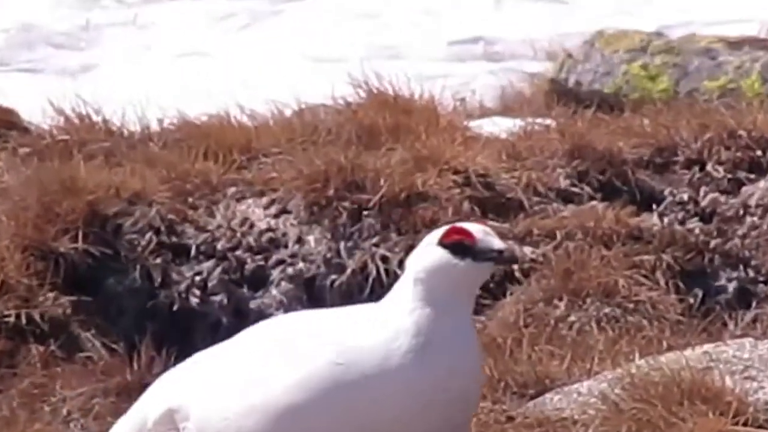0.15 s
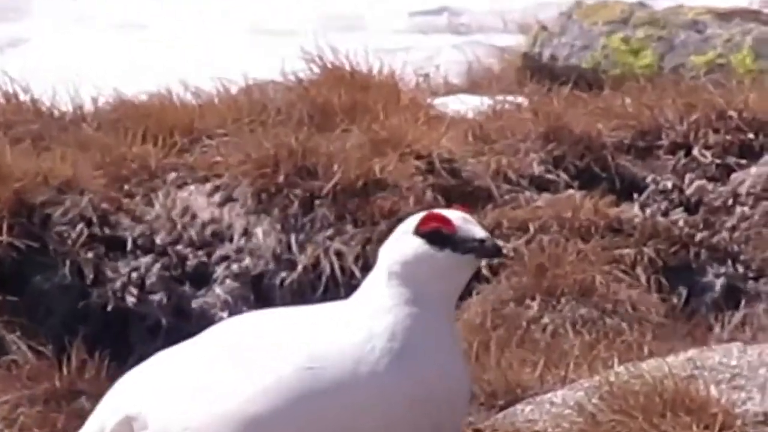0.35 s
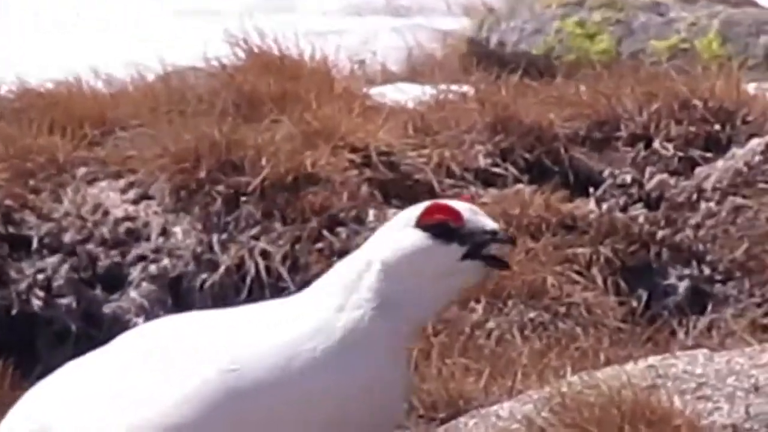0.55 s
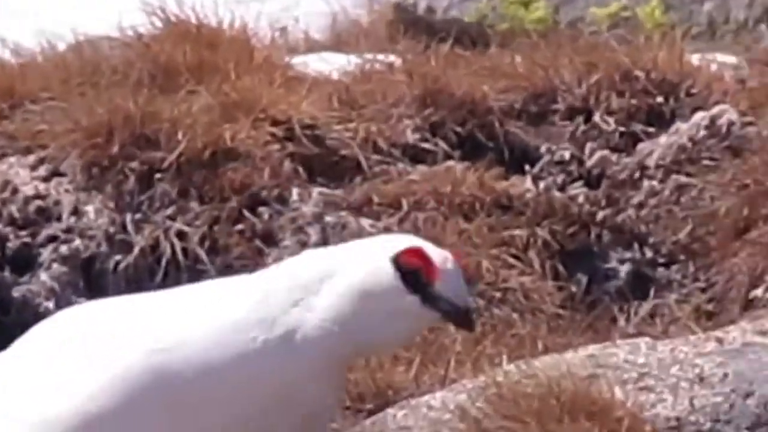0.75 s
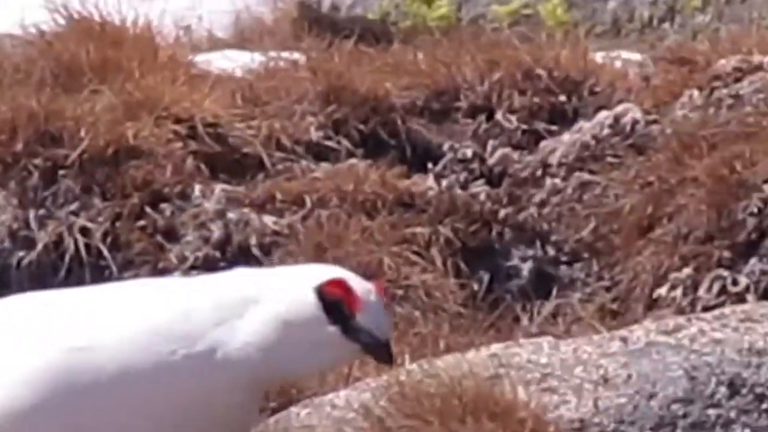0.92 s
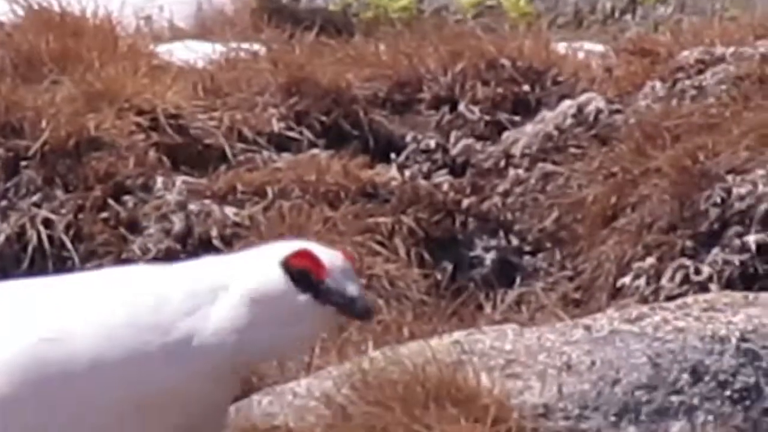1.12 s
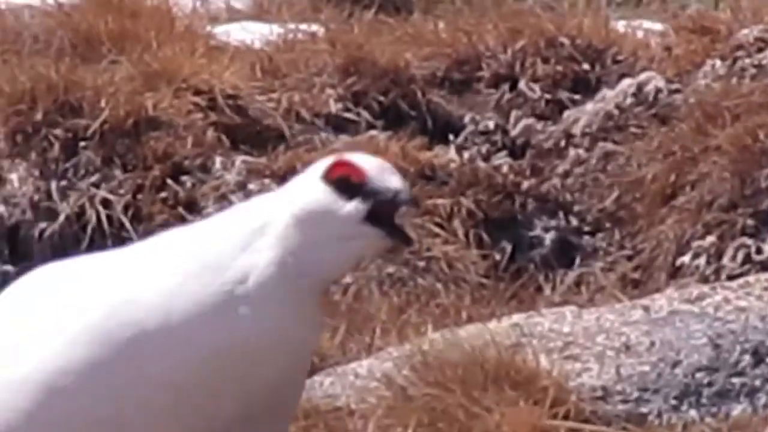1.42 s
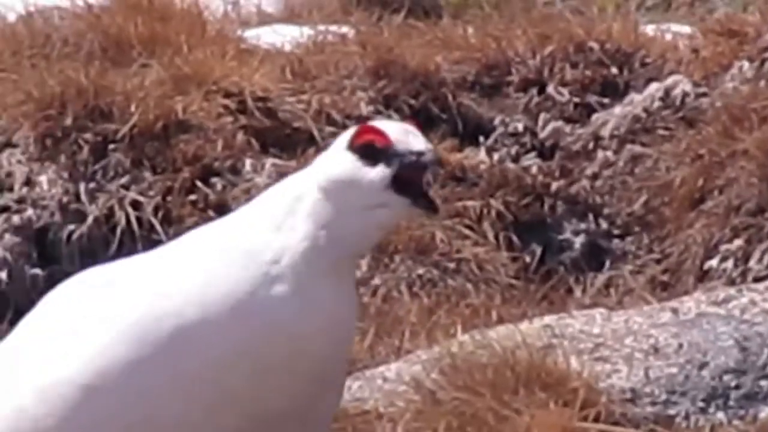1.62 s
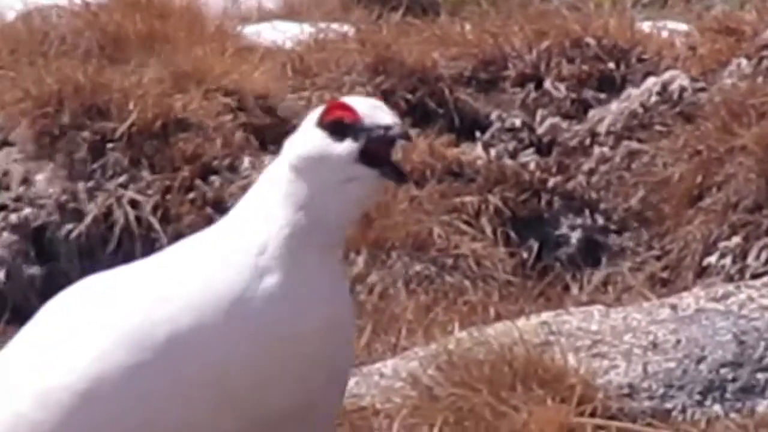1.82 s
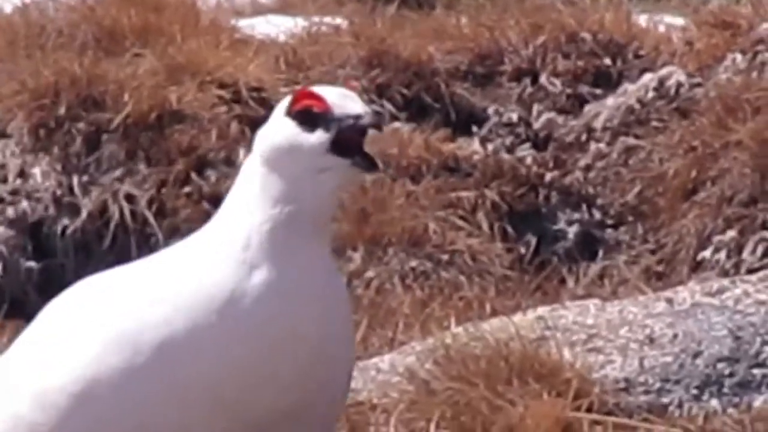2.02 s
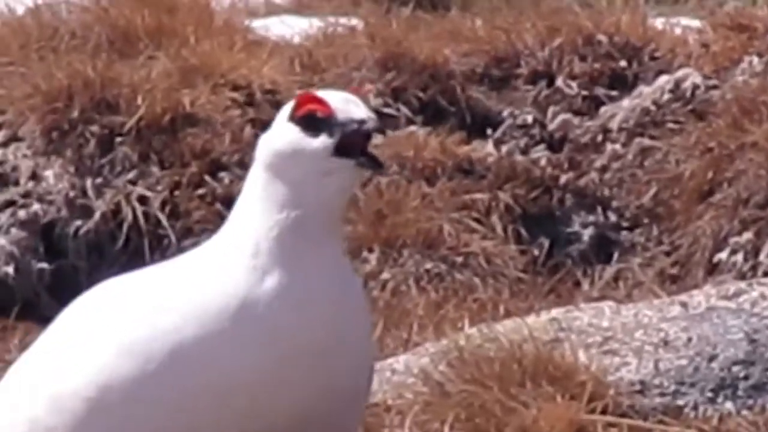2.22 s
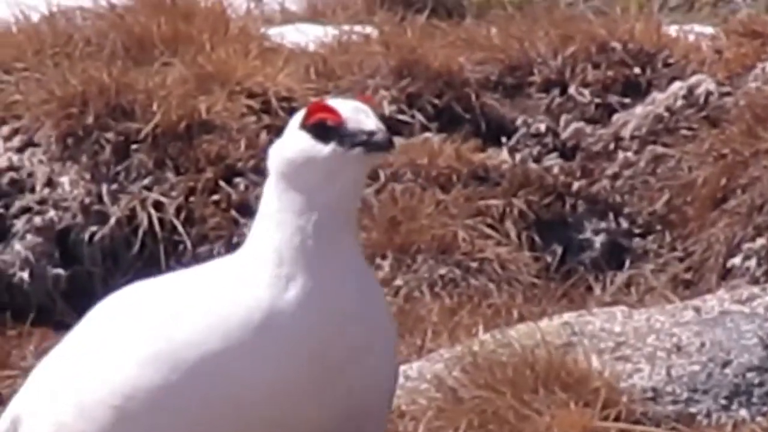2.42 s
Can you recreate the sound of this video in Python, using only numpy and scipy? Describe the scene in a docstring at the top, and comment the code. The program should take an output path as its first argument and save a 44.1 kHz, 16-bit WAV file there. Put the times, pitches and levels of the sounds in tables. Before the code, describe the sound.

A ptarmigan's dry ticks and long rattling croak in light wind, after one hard microphone knock

```python
"""A ptarmigan on a windy mountainside gives a few dry ticks, a short run and then a long rattling croak.
Each tick is one pulse ringing four throat resonances, which shift as the beak opens.
Wind is shaped noise, with low swings puffing on the microphone ports; dry grass rustles as spiky noise.
Sparse noise grains and a few clicks, one of them hard, ring the modes of the camera housing.
Gain control ducks the whole mix after the knock, then lets it creep back."""
import sys
import numpy as np
from scipy import signal
from scipy.fft import rfft, irfft
from scipy.io import wavfile
from scipy.ndimage import uniform_filter1d

SR = 44100
rng = np.random.default_rng(int(sys.argv[2]) if len(sys.argv) > 2 else 0)


def transcribe(u):
    """Save the signal u as a 16-bit wav file named by the first command-line argument.

    u: samples, shape (n,) or (channels, n), limited to [-1, 1]; the rate is SR.
    q: integer samples, one column per channel.
    """
    v = np.clip(np.atleast_2d(u).T, -1, 1)
    q = np.round(v * 32767).astype(np.int16)
    wavfile.write(sys.argv[1], SR, q)


N = 112454  # length in samples

# Wind and hiss colour, relative: hz, density_db (per Hz)
WIND_COLOUR = [(20, -3), (45, 2.5), (110, -7), (200, -8), (400, -11), (800, -16.5), (1500, -22),
               (3000, -26.5), (6000, -32), (10000, -37.5), (13000, -42.5), (15500, -50.5)]
# Strength of the wind over time: time_s, strength_db
WIND_STRENGTH = [(0, -1), (.15, -2), (.3, 2.5), (.5, -3.5), (.8, -2), (1.1, -2.5), (1.35, -2.5),
                 (1.6, -1.5), (1.75, 0), (1.95, -1.5), (2.25, -0.5), (2.55, -3)]
# How far each band follows the wind: hz, share
WIND_FOLLOW = [(60, 1.35), (500, 0.51), (2000, .8), (6000, 0.342), (15000, .2)]
AIR_DB = -44  # overall wind level, rms
GUST_DB, PATCH_DB = 1.27, 1.63  # rms wander of all bands together, and of patches, before the share

# Clicks of the camera housing: start_s, level_db (before panning)
HOUSING_CLICKS = [(0.079, -41), (.229, -34.5), (0.255, -37.5), (0.2931, -31.5), (.339, -43), (0.3936, -22),
                  (0.4051, 4.5), (0.4126, -17), (.643, -37), (0.868, -43.5), (0.89, -55), (1.0207, -38.5)]
# Modes of the housing: pitch_hz, level_db (relative), ring_t60_s
HOUSING_MODES = [(635, -16.5, 0.028), (689, -13, .035), (889, -16, .028), (1010, -47, .22),
                 (1432, -0.5, 0.011), (1665, -6, 0.0082), (1740, -45, .15), (2097, -9.5, 0.0087),
                 (2374, -10.5, 0.017), (3380, -13, 0.0088), (4120, -21, 0.021), (4900, -14.5, .012),
                 (5420, -31, 0.0096), (6670, -27, 0.012), (10040, -25.5, 0.0081), (11440, -23, 0.0047)]
# Colour of the crack that starts each click, relative: hz, density_db (per Hz)
CRACK_COLOUR = [(100, -31.5), (400, -19.5), (700, -5), (1500, 2), (2500, -6), (2900, -16), (4700, -4),
                (5600, -25), (11500, -11), (15000, -37)]
# Colour of the faint diffuse ring that follows, relative: hz, density_db (per Hz)
AFTER_RING_COLOUR = [(200, -23), (600, -12), (1000, -6), (1200, -17.5), (1700, 0.5), (2100, -10.5),
                     (3000, -25.5), (8000, -50.5)]
# Level of the grainy noise before the hard knock, a faint scrape, then a steep swell:
# time_s, level_db (before softening and panning)
GRAIN_LEVEL = [(.18, -60.5), (.23, -54.5), (.31, -46.5), (.325, -54.5), (.35, -44.5), (.39, -41),
               (.404, -6.5), (.41, -75)]
GRAINS_PER_S, GRAIN_TOP_HZ = 230, 3200  # mean rate on each side; the grains are duller above this
PORT_LAG_S = 0.00006  # clicks reach the left port this much later
CRACK_DB, CRACK_S = -13.5, 0.0026  # level, decay time constant
AFTER_DB, AFTER_T60 = -42.5, 0.38  # level, ring time in seconds
HOUSING_LOW_HZ, HOUSING_PAN_DB = 480, 3.5  # low cut; left over right

# Puffs of wind on the ports: start_s, level_db (before the split), pitch_hz, rise_s, right_share (0-1)
WIND_PUFFS = [(.19, -23, 50.4, 0.022, .98), (0.223, -12, 121, 0.0036, 1), (0.235, -17, 58.6, 0.0039, 0.9),
              (0.25, -23, 96, 0.0092, .98), (0.284, -19.5, 74.6, 0.0051, 0.8), (.335, -29, 145, .004, 0.14),
              (0.82, -28, 71, 0.0022, 0.2), (0.887, -25.5, 179, 0.0017, 0.05),
              (.983, -26.5, 109, 0.0049, 0.2), (1.322, -35.5, 98, 0.0047, 0.5),
              (1.752, -29.5, 103, 0.0076, 0.64)]

# Pulses of the voice: start_s, low_db, main_db, third_db, top_db (relative resonance levels)
VOICE_PULSES = [(0.7776, -56.5, -53.0, -65, -80), (0.813, -47.5, -39, -46.5, -65),
                (0.85, -69, -54, -50, -71.0), (0.8914, -52, -83, -63.0, -72), (0.9367, -57, -65, -77, -74),
                (1.3621, -59, -63.0, -78, -73.0), (1.4013, -58.5, -57, -65.0, -76.0),
                (1.4374, -49.5, -58, -57, -64), (1.4716, -46.5, -57, -51.5, -57),
                (1.5055, -44.5, -47, -49.5, -54), (1.539, -50, -49.5, -60, -57),
                (1.6791, -47, -44.5, -70, -64), (1.7048, -43.5, -42.0, -67, -61),
                (1.7352, -46.5, -46.0, -73, -59), (1.7651, -47.0, -53.5, -60, -67.0),
                (1.796, -45.5, -54, -57, -65), (1.8259, -44.5, -53, -50.5, -68),
                (1.8553, -44, -56, -52.5, -69.0), (1.8823, -44.5, -46, -49, -71),
                (1.9109, -41.5, -48.5, -49.5, -76), (1.9391, -42.5, -45, -58, -70),
                (1.9662, -42.5, -39.5, -65, -60), (1.9933, -45, -36.5, -64, -57),
                (2.02, -43.0, -35.0, -59, -73), (2.0472, -41.5, -33.5, -53.5, -74),
                (2.0732, -43.5, -33.5, -53, -66.0), (2.1009, -41.5, -33.0, -58, -57),
                (2.1278, -41.5, -33.5, -53, -53), (2.1544, -42, -34.0, -53.5, -63.0),
                (2.18, -41.5, -36.0, -55, -64.0), (2.2077, -38.5, -36.5, -58, -70),
                (2.2353, -41, -38, -49.0, -52), (2.2632, -39.5, -38.0, -51.5, -53),
                (2.2921, -42.5, -40.5, -51, -65.0), (2.321, -42, -35.0, -50, -56),
                (2.3492, -40, -35.5, -54, -59), (2.3802, -44.5, -37, -57, -55.5)]
# Throat as the beak opens: time_s, low_hz, main_hz, third_hz, top_hz, ring_t60_s
THROAT_SHAPE = [(.81, 1130, 2345, 3100, 5170, 0.022), (.9, 930, 2130, 2630, 5100, 0.0039),
                (1.4, 980, 2160, 2700, 5200, .007), (1.5, 1253, 2380, 3240, 5570, 0.026),
                (1.7, 1177, 2390, 3700, 5030, 0.024), (1.85, 1200, 2280, 3260, 5000, 0.016),
                (1.96, 1245, 2493, 3360, 5160, 0.026), (2.07, 1310, 2480, 4100, 5400, 0.021),
                (2.21, 1385, 2380, 3780, 5640, 0.022), (2.38, 1295, 2380, 3700, 6100, 0.024)]
# The four resonances: ring_share (of the throat's), starting_flatness (share of pitch), trim_db
THROAT_RESONANCES = [(1.1, 0.11, -2.5), (0.83, 0.16, 0), (0.62, 0.17, -1.5), (0.47, 0.098, -5)]
# Colour of the noisy snap that starts each pulse, relative: hz, density_db (per Hz)
SNAP_COLOUR = [(100, -20), (400, 7), (900, -6), (1750, -2), (2700, 1), (4000, -16), (4600, -17),
               (6500, -20), (10000, -27.5), (15000, -34)]
SETTLE_S, PULSE_RISE_S = 0.0014, 0.00036  # time constants of the slide up to pitch and of the rise
SNAP_DB, SNAP_S = -4, 0.0023  # level over the low resonance, decay time constant
PUSH_DB, PUSH_S = 9.5, 0.00026  # push of air: peak over the low resonance level, time to peak
PITCH_JITTER, RING_JITTER = 0.016, 0.08  # pulse-to-pulse spread, as shares
BIRD_PAN_DB = 1.6  # left over right
GROUND_DB, GROUND_T60 = -9.5, 0.05  # scatter level, decay in seconds

# Rustles in dry grass: start_s, length_s, level_db (before the swell), pitch_factor
GRASS_RUSTLES = [(.866, 0.029, -44.5, .29), (1.152, 0.039, -48.5, 1), (1.278, 0.028, -48, 0.99)]
# Resonances of the stems, before the pitch factor: pitch_hz, width_hz, level_db (relative)
GRASS_STEMS = [(2230, 1000, 0.5), (3560, 240, 6), (4360, 360, -4)]

# Stereo widening in the recorder: hz, side_gain_db
SIDE_GAIN = [(50, 8), (150, 8.5), (400, 4.5), (800, 5.5), (1400, 4.5), (2600, 3), (15000, -2)]
LIMIT_DB, DUCK_SHARE = -10, 1  # threshold, share of the excess taken off
RECOVER_DB_PER_S, DUCK_HOLD_S, DUCK_ATTACK_S = 16, 0.069, 0.0023
EDGE_HZ = 15800  # upper band limit


def amp(db):
    """Turns decibels into gain."""
    return 10 ** (np.asarray(db) / 20)


def evened(x):
    """Scales to rms 1."""
    return x / np.sqrt(np.mean(x ** 2) + 1e-20)


def read(points, hz):
    """Reads a spectrum on a log-frequency axis."""
    f, value = np.transpose(points)
    return np.interp(np.log(hz + 1), np.log(f + 1), value)


def along(table, t):
    """Reads every column of a curve at time t."""
    s, *columns = np.transpose(table)
    return [np.interp(t, s, c) for c in columns]


def add(mix, s, sound):
    """Mixes a sound in at time s."""
    part = mix[..., max(round(s * SR), 0):][..., :sound.shape[-1]]
    part += sound[..., :part.shape[-1]]


def seconds(size):
    """Gives a time axis of so many samples."""
    return np.arange(size) / SR


def ring_down(t, t60):
    """Exponential decay that falls 60 dB in t60 seconds."""
    return np.exp(-np.log(1000) * t / t60)


def hiss(spectrum, size):
    """Two unrelated noises of one colour, rms 1."""
    gain = amp(read(spectrum, np.fft.rfftfreq(size, 1 / SR)))
    white = rng.standard_normal((2, size))
    return evened(irfft(rfft(white) * gain, size))


def air():
    """Wind noise, unrelated at the two ports, each band following the gusts by its own share."""
    hop = 256
    frames, hz = N // hop + 5, np.fft.rfftfreq(1024, 1 / SR)
    real, imag, patches = rng.standard_normal((3, 2, len(hz), frames))
    # Patches drift over both pitch and time; gusts move every band at once
    patches = uniform_filter1d(patches, size=12, axis=1)
    patches = evened(uniform_filter1d(patches, size=6, axis=2))
    gusts = evened(uniform_filter1d(rng.standard_normal((2, 1, frames)), size=6, axis=2))
    strength = along(WIND_STRENGTH, seconds(frames) * hop)[0]
    movement_db = strength + GUST_DB * gusts + PATCH_DB * patches
    field_db = read(WIND_COLOUR, hz)[:, None] + read(WIND_FOLLOW, hz)[:, None] * movement_db
    noise = signal.istft((real + 1j * imag) * amp(field_db), nperseg=1024, noverlap=768)[1]
    return amp(AIR_DB) * evened(noise[:, :N])


def housing_ring():
    """One blow to the camera body: ringing modes, a noisy crack and a faint diffuse after-ring."""
    t = seconds(size=10000)
    ring = np.zeros((2, len(t)))
    for k, (hz, db, t60) in enumerate(HOUSING_MODES):
        sign = (-1) ** k  # neighbouring modes start in opposite directions
        ring += sign * amp(db) * ring_down(t, t60) * np.sin(2 * np.pi * hz * t)
    ring += amp(CRACK_DB) * hiss(CRACK_COLOUR, size=len(t)) * np.exp(-t / CRACK_S)
    ring += amp(AFTER_DB) * hiss(AFTER_RING_COLOUR, size=len(t)) * ring_down(t, AFTER_T60)
    low_cut = signal.butter(4, HOUSING_LOW_HZ, "high", fs=SR, output="sos")
    return signal.sosfilt(low_cut, ring)


def housing():
    """Sparse random grains and a few clicks, one of them hard, set the camera body ringing."""
    ring = housing_ring()
    grains = rng.standard_normal((2, N)) * (rng.random((2, N)) < GRAINS_PER_S / SR)
    grains = signal.lfilter(*signal.butter(1, GRAIN_TOP_HZ, fs=SR), evened(grains))
    grains *= amp(along(GRAIN_LEVEL, seconds(N))[0]) / np.linalg.norm(ring[0])
    out = signal.fftconvolve(grains, ring, axes=1)[:, :N]
    for start, db in HOUSING_CLICKS:
        add(out[0], start + PORT_LAG_S, amp(db) * ring[0])
        add(out[1], start, amp(db) * ring[1])
    return out * amp([[HOUSING_PAN_DB / 2], [-HOUSING_PAN_DB / 2]])


def puffs():
    """Eddies push on the ports: low swings that swell and die."""
    out, t = np.zeros((2, N)), seconds(size=7000)
    for start, db, hz, rise, right in WIND_PUFFS:
        swell = t / rise * np.exp(1 - t / rise)
        swing = amp(db) * swell * np.sin(2 * np.pi * hz * t)
        add(out, start, np.outer([1 - right, right], swing))
    return out


def pulse(start, *levels_db):
    """A push of air and a noisy snap, with four throat resonances that slide up to pitch and ring out."""
    t = seconds(size=1764)
    low_db = levels_db[0]
    *pitches, ring = along(THROAT_SHAPE, start)
    chance = rng.standard_normal(5)
    pitches = pitches * (1 + PITCH_JITTER * chance[1:])
    ring = ring * np.exp(RING_JITTER * chance[0])
    rise = 1 - np.exp(-t / PULSE_RISE_S)
    snap = evened(hiss(SNAP_COLOUR, size=len(t))[0] * rise * np.exp(-t / SNAP_S))
    out = amp(low_db + SNAP_DB) * snap
    # The 2 makes up for the halving of the whole pulse below
    out += amp(low_db + PUSH_DB) * 2 * t / PUSH_S * np.exp(1 - t / PUSH_S)
    signs = (1, -1, 1, -1)
    for hz, db, sign, (share, flat, trim_db) in zip(pitches, levels_db, signs, THROAT_RESONANCES):
        turns = np.cumsum(hz * (1 - flat * np.exp(-t / SETTLE_S))) / SR
        tone = rise * ring_down(t, ring * share) * np.sin(2 * np.pi * turns)
        out += sign * amp(db + trim_db) * evened(tone)
    return out / 2


def bird():
    """The train of pulses, a little to the left, with a faint decaying scatter from the slope."""
    voice, t = np.zeros(N), seconds(size=6000)
    for row in VOICE_PULSES:
        add(voice, row[0], pulse(*row))
    scatter = rng.standard_normal((2, len(t))) * ring_down(t, GROUND_T60)
    scatter *= t > 0.003  # nothing comes back sooner than 3 ms
    scatter /= np.linalg.norm(scatter[0])
    echo = signal.fftconvolve(voice[None], scatter, axes=1)[:, :N]
    return voice * amp([[BIRD_PAN_DB / 2], [-BIRD_PAN_DB / 2]]) + amp(GROUND_DB) * echo


def rustles():
    """A dull scuff and two brief crackles of dry stems, made from spiky noise through resonances."""
    out, t = np.zeros((2, N)), seconds(size=4096)
    for start, length, db, pitch in GRASS_RUSTLES:
        hz = np.fft.rfftfreq(len(t), 1 / SR) / pitch
        colour = sum(amp(level) / (1 + (2 * (hz - f) / width) ** 2) for f, width, level in GRASS_STEMS)
        spiky = rng.standard_normal((2, len(t))) ** 3  # cubing makes the peaks stand out
        stems = evened(irfft(rfft(spiky) * colour))
        swell = np.sin(np.pi * np.minimum(t / length, 1) ** 0.64)
        add(out, start, amp(db) * stems * swell)
    return out


def scene():
    """The bird and the grass, the wind and the camera."""
    return bird() + rustles() + air() + puffs() + housing()


def record(dry):
    """Stereo widening, gain control that ducks on peaks and creeps back, overload and a band limit."""
    mid, side = dry.mean(0), (dry[0] - dry[1]) / 2
    side = irfft(rfft(side) * amp(read(SIDE_GAIN, np.fft.rfftfreq(N, 1 / SR))), N)
    wide = np.array([mid + side, mid - side])
    # The running peak falls back at a steady rate in dB
    t = seconds(N)
    peak_db = 20 * np.log10(np.clip(abs(mid), 1e-6, 1))
    fall_db = t * RECOVER_DB_PER_S
    falling_peak_db = np.maximum.accumulate(peak_db + fall_db) - fall_db
    over_db = np.maximum(falling_peak_db - LIMIT_DB, 0)
    held_db = np.maximum(over_db, np.interp(t - DUCK_HOLD_S, t, over_db))
    smoothing = np.exp(-1 / (DUCK_ATTACK_S * SR))
    duck_db = DUCK_SHARE * signal.lfilter([1 - smoothing], [1, -smoothing], held_db)
    clipped = np.clip(wide * amp(-duck_db), -1, 1)
    band_limit = signal.firwin(511, EDGE_HZ, window=("kaiser", 9), fs=SR)
    return signal.oaconvolve(clipped, band_limit[None], "same")


dry = scene()
out = record(dry)
transcribe(out)
```